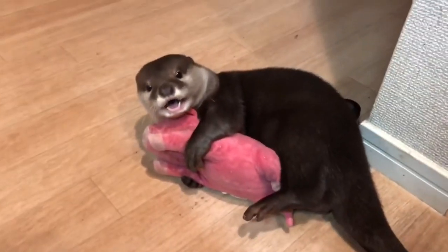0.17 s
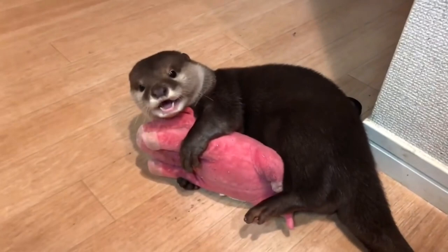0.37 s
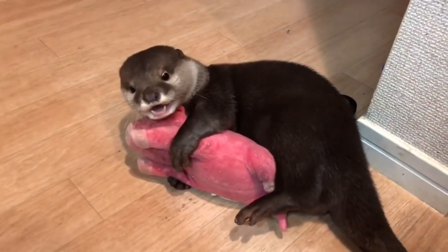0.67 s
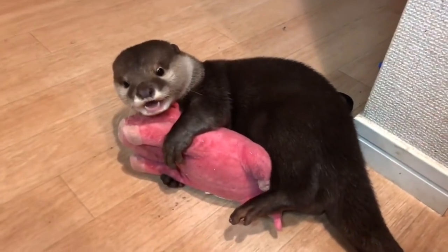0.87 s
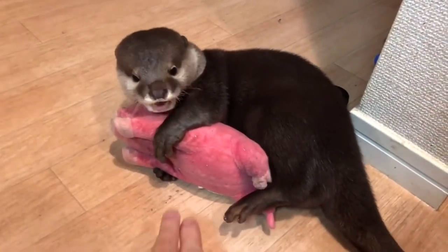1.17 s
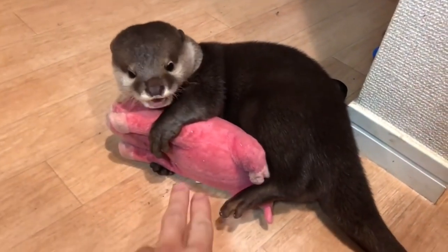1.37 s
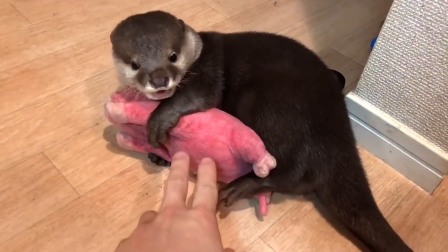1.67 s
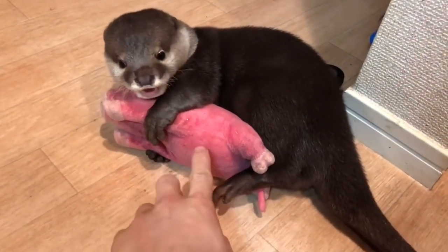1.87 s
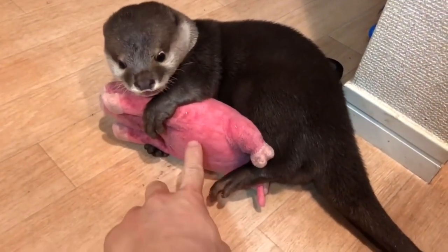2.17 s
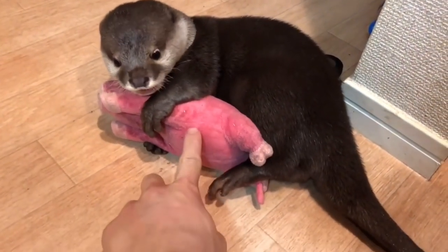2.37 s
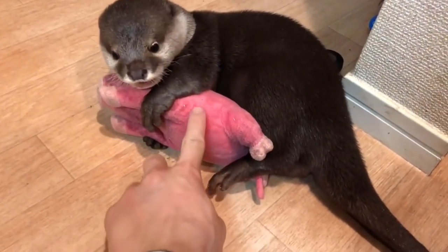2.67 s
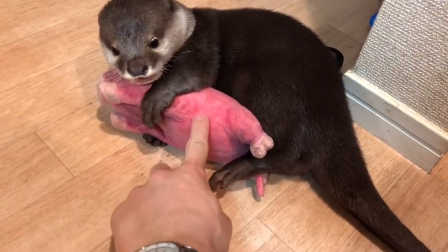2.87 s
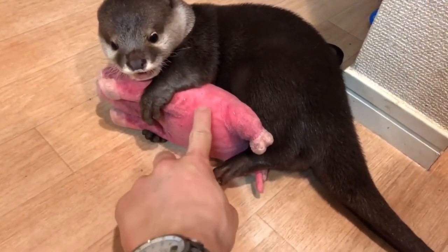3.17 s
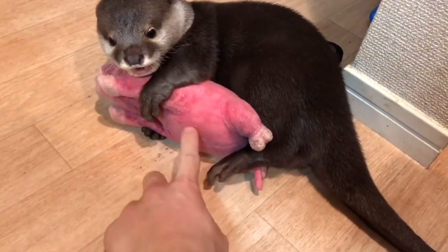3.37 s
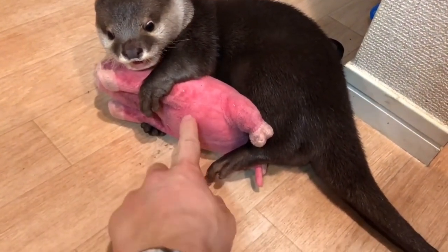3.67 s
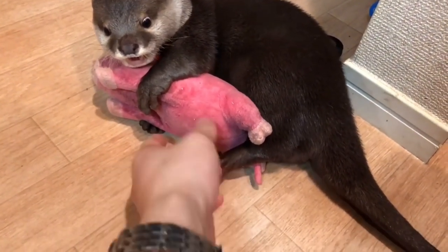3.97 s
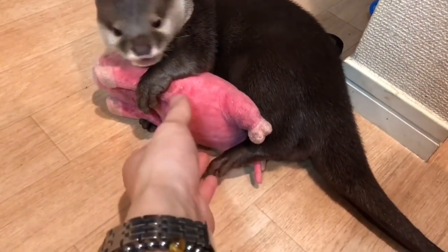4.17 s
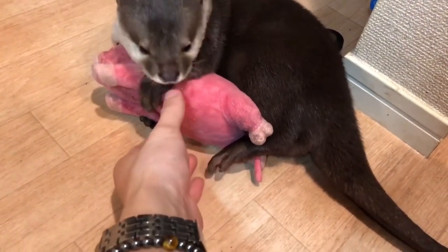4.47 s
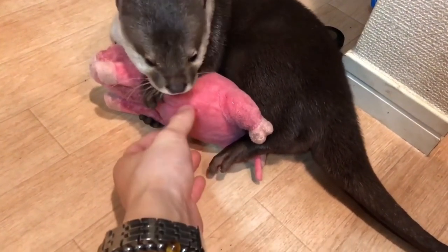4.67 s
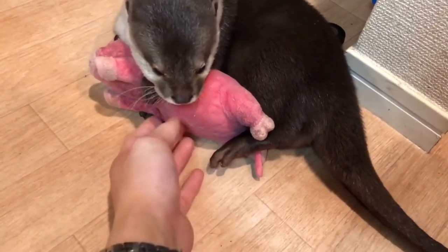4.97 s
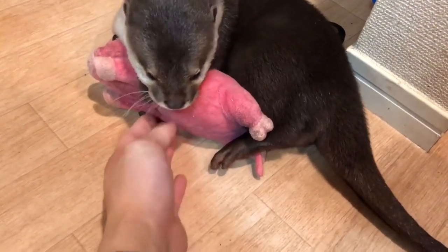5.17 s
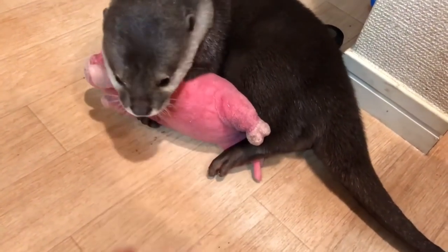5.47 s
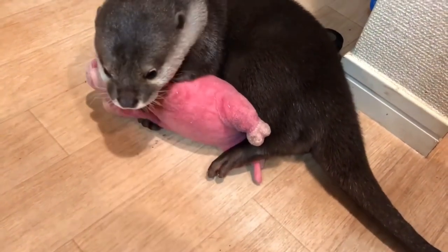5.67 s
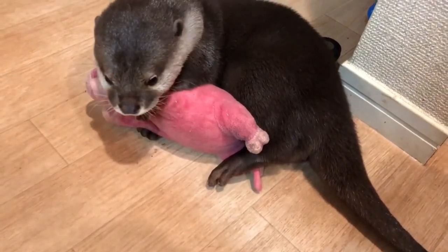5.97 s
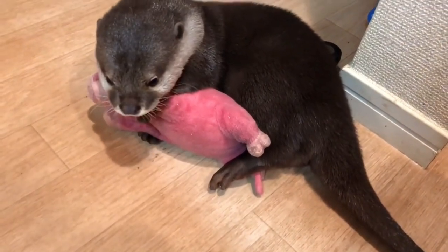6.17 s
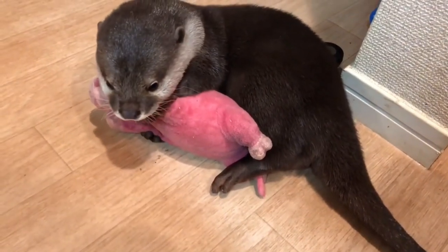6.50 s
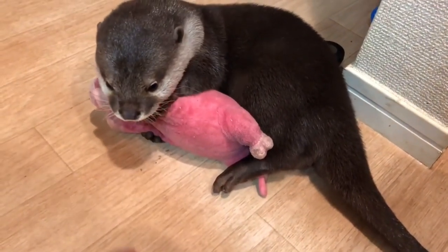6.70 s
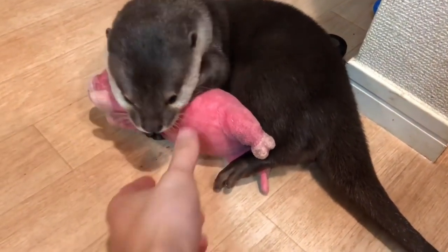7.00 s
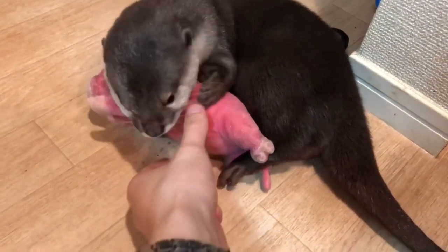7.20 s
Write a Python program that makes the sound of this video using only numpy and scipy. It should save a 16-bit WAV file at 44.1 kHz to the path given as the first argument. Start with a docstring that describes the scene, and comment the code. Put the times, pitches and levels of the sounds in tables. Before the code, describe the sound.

An otter squeals again and again in high, wavering calls, breaks into short yelps, then squeals once more in a small room.

```python
"""Over faint room tone, an otter guarding a toy on a wooden floor squeals seven times. Its vocal folds
beat at about 600-850 Hz, often strong-weak and unevenly; a small room answers briefly.
From 1.5 s the microphone is handled: low, lumpy rumble, from 3.3 s also soft thuds.
From 4.5 s come four yelps, the mouth closing as the head lowers, then two squeals and a last yelp."""
import sys
import numpy as np
from scipy import signal
from scipy.fft import rfft, irfft
from scipy.io import wavfile
from scipy.ndimage import uniform_filter1d

SR = 44100
rng = np.random.default_rng(int(sys.argv[2]) if len(sys.argv) > 2 else 0)


def transcribe(u):
    """Save the signal u as a 16-bit wav file named by the first command-line argument.

    u: samples, shape (n,) or (channels, n), limited to [-1, 1]; the rate is SR.
    q: integer samples, one column per channel.
    """
    v = np.clip(np.atleast_2d(u).T, -1, 1)
    q = np.round(v * 32767).astype(np.int16)
    wavfile.write(sys.argv[1], SR, q)


N = 323694
STEP = 32   # samples per control value
CONTROL_S = np.arange(N // STEP + 2) * STEP / SR


def from_db(db):
    return 10 ** (np.asarray(db) / 20)


def unit_rms(x):
    return x / np.sqrt(np.mean(np.abs(x) ** 2) + 1e-20)


def wander(rate_hz, rows=1):
    """Rows of low-passed noise at the control rate, unit RMS."""
    sos = signal.butter(2, rate_hz, fs=SR / STEP, output="sos")
    return unit_rms(signal.sosfilt(sos, rng.standard_normal((rows, len(CONTROL_S) + 500)))[:, 500:])


def full_rate(control):
    return np.interp(np.arange(N) / STEP, np.arange(len(control)), control)


def resonance(x, hz, width_hz):
    """Two-pole peak, unit gain on top."""
    r = np.exp(-np.pi * width_hz / SR)
    poles = [1, -2 * r * np.cos(2 * np.pi * hz / SR), r * r]
    return signal.lfilter(np.array([1, 0, -1]) * (1 - r * r) / 2, poles, x)


# centre_hz, width_hz, level_db
ROOM_HUMS = [(166, 18, -81), (341, 42, -79.5)]


def room_tone(level_db=-75):
    """Steady coloured noise with two low resonances."""
    hz = np.maximum(np.arange(N // 2 + 1) * SR / N, 1)
    colour_db = np.interp(np.log(hz), np.log([30, 85, 351, 976, 15600]), [-31, -3, -16, -15.5, -41.5])
    noise = irfft(rfft(rng.standard_normal(N)) * from_db(colour_db), N)
    hums = sum(from_db(db) * unit_rms(resonance(rng.standard_normal(N), centre_hz, width_hz))
               for centre_hz, width_hz, db in ROOM_HUMS)
    return from_db(level_db) * unit_rms(noise) + hums


# One contour per squeal: time_s, pitch_hz, level_db
SQUEAL_CONTOURS = [
    [(0., 590, -47.5), (.02, 600, -42.5), (.035, 715, -37.5), (.078, 783, -36.5), (.11, 758.4, -36),
     (.23, 708, -37), (.3, 667, -45.5)],
    [(.428, 653, -48.5), (.49, 786, -35), (.59, 721, -34), (.71, 737, -36), (.83, 726.6, -36),
     (.93, 703.5, -37), (.975, 677, -42)],
    [(1.124, 639, -45.5), (1.156, 653, -37), (1.172, 763, -37), (1.2, 793, -33.5), (1.3, 715, -35),
     (1.356, 716, -36.5), (1.43, 679, -39), (1.5, 641, -45.5)],
    [(1.644, 606, -47), (1.7, 718, -41), (1.74, 664, -44), (1.82, 679, -41), (1.876, 756, -36),
     (1.98, 807.6, -32), (2.085, 770, -40)],
    [(2.263, 710, -42), (2.31, 683, -40.5), (2.364, 786, -36), (2.436, 807, -35), (2.53, 847, -32.5),
     (2.67, 817.6, -34.5), (2.75, 760, -38), (2.855, 740, -42.5)],
    [(3.045, 679, -46), (3.1, 739, -40), (3.233, 777.5, -38), (3.255, 827.6, -36.5), (3.34, 840, -34.5),
     (3.48, 828.8, -33.5), (3.58, 821, -35), (3.682, 755, -42)],
    [(3.96, 673, -44.5), (4.008, 714, -49), (4.024, 785, -45.5), (4.13, 820, -37.5), (4.224, 850, -34.5),
     (4.29, 829, -32.5), (4.337, 767, -38.5)],
    [(5.508, 826, -36), (5.545, 808.5, -35.5), (5.59, 800, -32.5), (5.65, 752.4, -31.5), (5.764, 717, -32),
     (5.864, 748.7, -31.5), (5.985, 762, -32.5), (6.05, 744, -32), (6.16, 711, -32), (6.34, 699.7, -32.5),
     (6.47, 688, -32.5), (6.565, 644, -36)],
    [(6.734, 551, -53.5), (6.765, 602, -36), (6.79, 702, -36.5), (6.812, 712, -33.5), (6.9, 692, -33.5),
     (7.01, 682.7, -33.5), (7.06, 656, -38)],
]
# Fold state per squeal: opening_s, opening_roughness, opening_subharmonic_db, roughness, subharmonic_db
SQUEAL_VOICES = [(.14, 0.48, -17, 0.27, -6.5), (.17, 0.42, -6, 0.22, -12), (0.083, 0.37, -3.5, 0.22, -16),
                 (0.25, 0.28, -17, 0.16, -17), (0.1, 0.33, -10, 0.14, -11), (0.2, 0.24, -15, 0.1, -16),
                 (0.2, 0.28, -9, 0.14, -20), (0.114, 0.2, -11.5, 0.07, -17), (0.15, 0.27, -9, 0.21, -10)]
# Voice cracks: start_s, roughness, subharmonic_db
VOICE_CRACKS = [(.82, 0.2, -9), (2.751, 0.3, -17), (4.015, 0.55, -3), (4.06, 0.21, -5), (5.88, 0.21, -8),
                (6.1, 0.2, -4)]


def squeals():
    """Contour and fold states of each squeal: it opens in one voice, settles into another, may crack."""
    for contour, (opening_s, roughness, sub_db, *settled) in zip(SQUEAL_CONTOURS, SQUEAL_VOICES):
        start_s, end_s = contour[0][0], contour[-1][0]
        cracks = [crack for crack in VOICE_CRACKS if start_s < crack[0] < end_s]
        yield contour, sorted([(start_s, roughness, sub_db), (start_s + opening_s, *settled)] + cracks)


# Pitch catches: time_s, drop_percent
PITCH_DIPS = [(.655, 10.5), (0.744, 8.4), (0.774, 4.4), (5.048, 7.5), (5.327, 2), (5.646, 4), (5.9, 5.2),
              (5.944, 5.7), (6.023, 10.4), (6.203, 9.3), (6.276, 4.3)]


def fold_motion(contours, dip_s=.014, sag_percent=5.5, sag_s=.016):
    """Pitch and level, rounded off by the muscles; the pitch catches, and gives way as a call ends."""
    t = CONTROL_S
    time_s, pitch_hz, level_db = np.vstack(contours).T
    drop_percent = sum(depth * np.clip(1 - np.abs(t - at_s) / dip_s, 0, 1) for at_s, depth in PITCH_DIPS)
    drop_percent += sum(sag_percent * np.exp(-np.abs(c[-1][0] - t) / sag_s) for c in contours)
    pitch_hz = np.interp(t, time_s, pitch_hz) * (1 - drop_percent / 100)
    return uniform_filter1d(pitch_hz, size=15), uniform_filter1d(np.interp(t, time_s, level_db), size=9)


def fold_state(voices, settle_s=.025, catch_db=1.8):
    """Roughness (0-1, in short catches) and subharmonic level, gliding from state to state."""
    start_s, *columns = np.vstack(voices).T
    current = np.maximum(np.searchsorted(start_s, CONTROL_S) - 1, 0)
    roughness, sub_db = [uniform_filter1d(c[current], size=int(settle_s * SR / STEP)) for c in columns]
    return np.clip(roughness * from_db(catch_db * wander(23)[0]), 0, 1), sub_db


def fold_partials(k, octaves, roughness, sub_db, burst_db=4.5, flicker_db=3.5):
    """Even k: the voice. Odd k: strong-weak beats. Air rushing past the folds adds noise to each."""
    rows = len(k)
    odd_db = sub_db + 6 * np.minimum(octaves, .7) + burst_db * np.clip(2 * wander(11), -2, 1)
    odd_db += 2.5 * wander(20, rows)
    even_db = (1.5 + 5 * roughness) * wander(18, rows)
    lines = from_db(np.where(k % 2, np.minimum(odd_db, 0), even_db))
    lines *= from_db(flicker_db * np.maximum(octaves - 1, 0) * wander(8.8, rows))   # above 6 kHz
    smear = np.exp(1j * rng.normal(0, 1.6, (rows, 1)))   # the tract spreads each pulse in time
    air_db = -26 + 31 * roughness + 11.4 * np.minimum(octaves, 1.3)
    air = from_db(air_db) * (wander(360, rows) + 1j * wander(220, rows)) / 2
    return lines * smear + air


# Throat and mouth colour: frequency_hz, shut_db, half_open_db, open_db
TRACT_COLOUR = [(820, -15.5, -27, -22), (1746, -23.5, -16.5, -15), (2083, -14, -12.5, -16.5),
                (3282, 10.5, 2, -3), (3750, -10, -5, -6), (4940, -7, 1, -2.5), (5365, -6, -12.5, -9),
                (6100, -12.5, -12, -0.5), (7050, -8, -8, -7), (7900, -26, -13, -7), (8770, -19.5, -9, -6),
                (9820, -15.5, -26.5, -23.5), (10630, -27, -29, -22), (13000, -22, -28, -19),
                (15600, -27.5, -28, -22.5)]
# Mouth postures: time_s, opening_fraction, tract_length_ratio, ring_hz, lift_db
POSTURES = [(.2, 1, 0.97, 3600, 5), (.52, 0.91, 0.98, 6200, 3.5), (.7, 0.87, 1.015, 3860, 5.5),
            (.87, 0.81, 1.007, 4700, 6), (1.17, 1, 1.024, 4800, 7), (1.331, 0.76, 1.033, 7000, 8.5),
            (1.75, 0.64, 1.007, 8400, 5.5), (2.049, 0.62, 0.98, 8400, 5), (2.3, 0.34, 1.034, 2885, 1.5),
            (2.8, 0.68, 1.06, 2880, 6.5), (3.25, 0.58, 0.99, 3250, -0.5), (3.6, 0.52, 1.06, 7170, 5.5),
            (3.95, 0.59, 1.034, 5040, 7), (4.2, 0.6, 1.047, 5060, 13), (4.501, 0.96, 1.12, 2650, 10),
            (4.781, 0.3, 1.064, 4060, 1), (5.021, 0.25, 1.035, 4030, 10), (5.278, 0.2, 1, 7750, 0.5),
            (5.55, 0.12, 0.96, 6420, 6.5), (5.75, 0.086, 0.962, 6640, 9), (6.499, 0.093, 1.017, 6800, 3.5),
            (6.9, 0.044, 0.99, 7510, 9), (7.261, 0.2, 1.06, 7290, 3.5)]


def vocal_tract_db(hz, ring_octaves=.09):
    """Mouth opening and tract length colour the voice; in each posture one band rings out."""
    time_s, opening, length, *_ = np.transpose(POSTURES)
    opening, length, posture = [np.interp(CONTROL_S, time_s, c)
                                for c in (opening, length, np.arange(len(time_s)))]
    colour_hz, *shapes_db = np.transpose(TRACT_COLOUR)
    shut, half, wide = [np.interp(np.log(hz * length), np.log(colour_hz), db) for db in shapes_db]
    blend = 2 * opening
    gain_db = np.where(blend < 1, shut + blend * (half - shut), half + (blend - 1) * (wide - half))
    for i, (*_, ring_hz, lift_db) in enumerate(POSTURES):
        crossfade = np.clip(1 - np.abs(posture - i), 0, 1)
        gain_db += crossfade * lift_db * np.exp(-(np.log2(hz / ring_hz) / ring_octaves) ** 2 / 2)
    return gain_db


def otter(fill_s=.027, jitter_rad=.075, tremble_rad=.28):
    """The folds sound through the tract, as partials on multiples of half the pitch."""
    t = CONTROL_S
    contours, voices = zip(*sorted([*squeals(), *yelps()], key=lambda call: call[0][0][0]))
    spans_s = [(c[0][0], c[-1][0]) for c in contours]
    pitch_hz, level_db = fold_motion(contours)
    roughness, sub_db = fold_state(voices)
    k = np.arange(2, 54)[:, None]
    hz = k * pitch_hz / 2
    octaves = np.log2(hz / 3000)
    onset = sum(np.exp(-np.maximum(t - start, 0) / fill_s) * (t >= start) for start, _ in spans_s)
    thin_db = 4 * onset * np.minimum(octaves, 0)   # low partials come in late
    effort_db = .6336 * (level_db + 36) * octaves   # louder is brighter
    colour = from_db(vocal_tract_db(hz) + thin_db + effort_db) * (hz < CUTOFF_HZ + 500)
    partials = colour * fold_partials(k, octaves, roughness, sub_db)
    power = uniform_filter1d(np.sum(np.abs(partials) ** 2, axis=0) / 2, size=24)
    # the folds snap on, stop less sharply
    gate = sum(np.clip(np.minimum(2 * (t - start), end + .003 - t) / .009, 0, 1)
               for start, end in spans_s)
    partials *= gate * from_db(level_db) / np.sqrt(power)
    # early or late beats shift partial k by k times as much: the treble blurs first
    timing_rad = roughness * (jitter_rad * wander(230)[0] + tremble_rad * wander(60)[0])
    half_pitch = np.exp(1j * (np.cumsum(np.pi * full_rate(pitch_hz) / SR) + full_rate(timing_rad)))
    carrier, out = half_pitch, np.zeros(N)
    for partial in partials:
        carrier = carrier * half_pitch
        out += (full_rate(partial) * carrier).real
    return out


# Reverb bands: low_hz, high_hz, t60_s, gain_db
REVERB_BANDS = [(290, 1550, 0.17, -30.5), (3130, 6000, 0.25, -37.5), (5950, 22000, 0.15, -37)]


def room_reverb(x):
    """The walls answer after a few ms with a short, noise-like decay."""
    t = np.arange(SR // 2) / SR
    onset = np.clip(t / .007 - .5, 0, 1)
    response = np.zeros(len(t))
    for low_hz, high_hz, t60_s, gain_db in REVERB_BANDS:
        sos = signal.butter(2, [low_hz, high_hz], "band", fs=SR, output="sos")
        band = signal.sosfilt(sos, rng.standard_normal(len(t)))
        response += band * from_db(gain_db - 60 * t / t60_s) * onset
    return signal.fftconvolve(x, response)[:N]


# Handling rumble: time_s, level_db
RUMBLE_LEVELS = [(1.5, -78.5), (1.6, -66.5), (2.5, -67), (3.102, -77), (4.7, -69.5), (4.9, -75),
                 (6.9, -105), (7.1, -79)]


def handling_rumble(lump_db=4.7):
    """Low, lumpy rumble of the microphone being handled."""
    time_s, level_db = np.transpose(RUMBLE_LEVELS)
    envelope = from_db(np.interp(np.arange(N) / SR, time_s, level_db) + lump_db * full_rate(wander(18)[0]))
    noise = rng.standard_normal(N)
    low = resonance(resonance(noise, hz=97, width_hz=24), hz=72, width_hz=45)
    high = resonance(resonance(noise, hz=155, width_hz=25), hz=160, width_hz=150)
    return envelope * unit_rms(low + .42 * high)


# Handling bumps: start_s, gain_db
HANDLING_THUDS = [(3.302, -47), (3.77, -53), (4.506, -48), (4.568, -48), (6.278, -46)]


def handling_thuds(pitch_hz=103, t60_s=.084, attack_s=.012):
    """Soft, low handling bumps, each one quickly damped tone."""
    out = np.zeros(N)
    for start_s, gain_db in HANDLING_THUDS:
        t = np.maximum(np.arange(N) / SR - start_s, 0)
        envelope = from_db(gain_db - 60 * t / t60_s) * np.minimum(t / attack_s, 1)
        out += envelope * np.sin(2 * np.pi * pitch_hz * t)
    return out


def arch(progress, start, top, end, crest, rise_bend, fall_bend):
    """From start over a rounded top to end; a bend of 1 is a straight flank."""
    rise = np.clip(1 - progress / crest, 0, 1) ** rise_bend
    fall = np.clip((progress - crest) / (1 - crest), 0, 1) ** fall_bend
    return top + (start - top) * rise + (end - top) * fall


# Yelps: start_s, length_s, crest_db, start_hz, crest_hz, end_hz, roughness, subharmonic_db
YELP_CALLS = [(4.461, 0.13, -33.5, 655.3, 801, 762, 0.49, 3),
              (4.71, .13, -32.5, 648, 821, 769.6, 0.52, -1.5),
              (4.948, 0.16, -32, 727.6, 855, 780.5, 0.5, -4.5),
              (5.211, .19, -30.5, 721, 844, 755.3, 0.22, -12.5),
              (7.197, 0.13, -37.5, 640, 701, 630, 0.25, -20)]


def yelps():
    """Contour and fold states of each yelp: a short arch, clear, then rough, then clear again."""
    progress = np.linspace(0, 1, 16)
    for start_s, length_s, crest_db, *arch_hz, roughness, sub_db in YELP_CALLS:
        pitch_hz = arch(progress, *arch_hz, crest=.5, rise_bend=2.8, fall_bend=1.5)
        level_db = crest_db + arch(progress, -15, 0, -7, crest=.65, rise_bend=2.76, fall_bend=2.76)
        clear, rough = (.35 * roughness, sub_db - 12), (roughness, sub_db)
        states = [(start_s + at * length_s, *state)
                  for at, state in [(0, clear), (.24, rough), (.52, clear)]]
        yield np.c_[start_s + progress * length_s, pitch_hz, level_db], states


def scene():
    voice = otter()
    mono = voice + room_reverb(voice) + room_tone() + handling_rumble() + handling_thuds()
    return np.tile(mono, (2, 1))


CUTOFF_HZ = 15720


def record(dry):
    """Steep low-pass on both channels."""
    return signal.sosfilt(signal.ellip(12, .3, 75, CUTOFF_HZ, fs=SR, output="sos"), dry)


dry = scene()
out = record(dry)
transcribe(out)
```